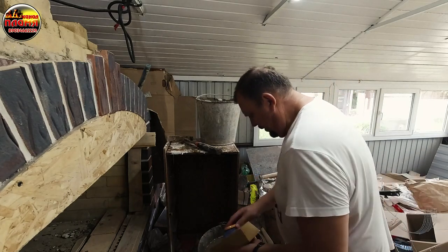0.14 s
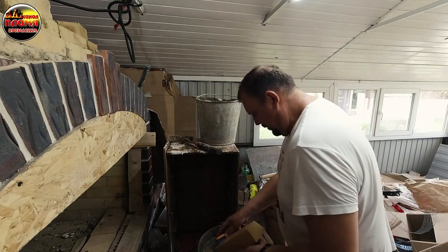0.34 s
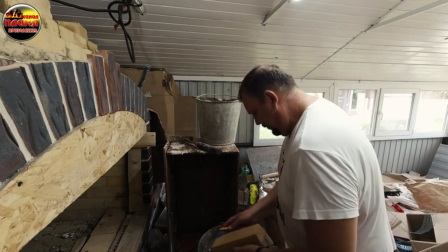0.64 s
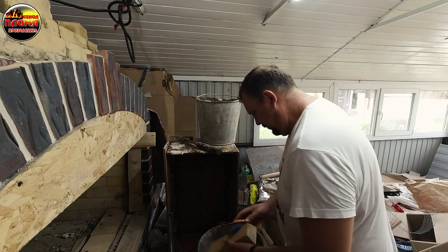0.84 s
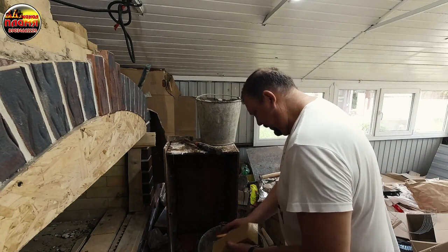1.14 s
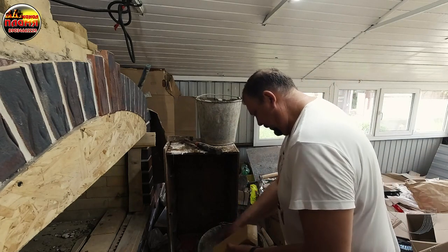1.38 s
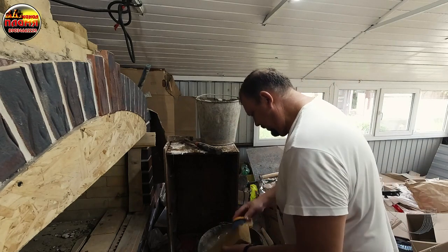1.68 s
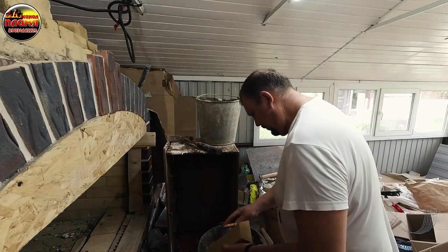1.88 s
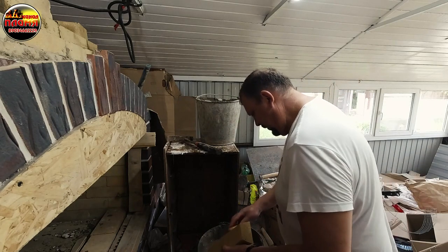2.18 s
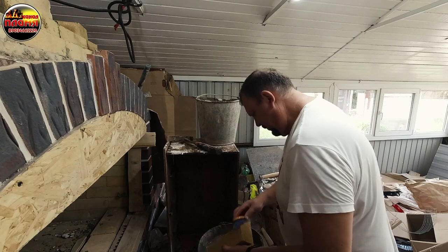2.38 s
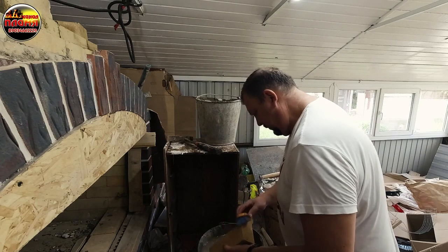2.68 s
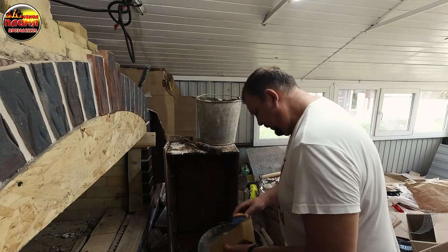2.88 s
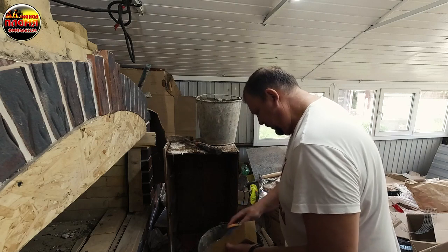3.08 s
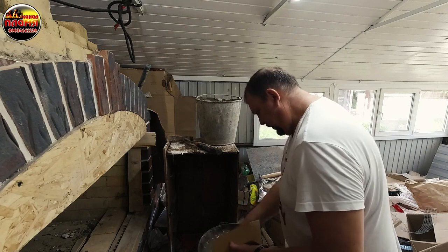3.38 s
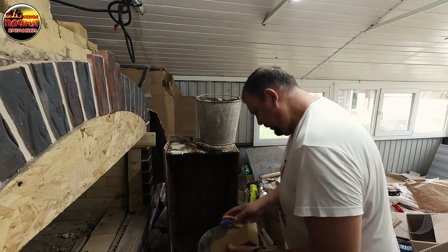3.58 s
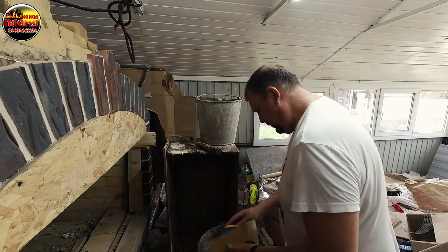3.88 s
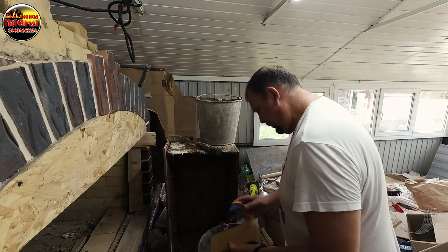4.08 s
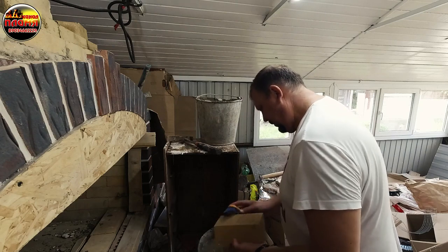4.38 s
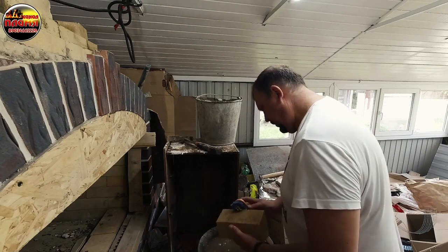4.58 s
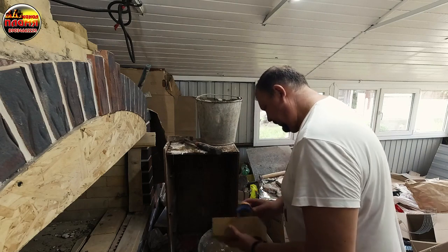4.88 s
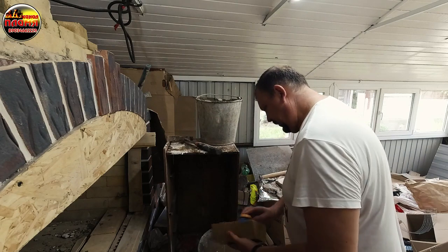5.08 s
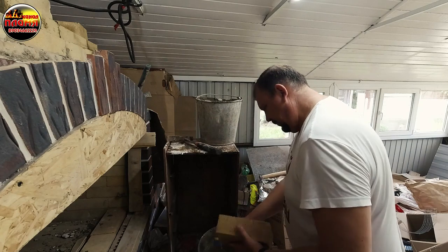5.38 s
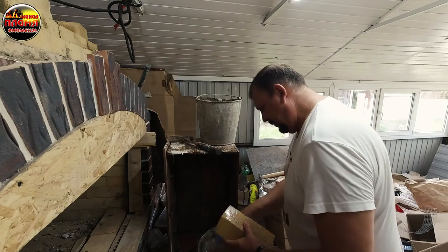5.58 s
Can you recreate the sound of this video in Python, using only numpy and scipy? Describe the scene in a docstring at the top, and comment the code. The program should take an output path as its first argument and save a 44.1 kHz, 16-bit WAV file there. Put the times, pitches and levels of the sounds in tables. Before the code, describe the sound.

A small wet brush scrubs a brick in quick, uneven strokes, the bristles hissing and rasping over grit. Between strokes it dips into a basin, making sharp little splashes, plops and fizzing droplets, with a soft low boom from the basin wall. One faint, thin squeak comes about midway, then the scrubbing and splashing carry on. The sound is fairly close, in a quiet workshop with a brief echo and a faint low rumble.

```python
"""Bristles hiss over grit, stroke after stroke: a wet brush scrubs a brick over a basin.
The brush dips and slaps the water; bubbles ring as plops and fizz, droplets tick, and the
water pushes the basin wall into a soft boom. One faint squeak sounds midway.
Floor and bench rumble under the work; the low workshop answers briefly."""
import sys
import numpy as np
from scipy import signal
from scipy.fft import rfft, irfft, next_fast_len
from scipy.io import wavfile
from scipy.ndimage import uniform_filter1d, map_coordinates

SR = 44100
rng = np.random.default_rng(int(sys.argv[2]) if len(sys.argv) > 2 else 0)


def to_wav(s):
    """Save 16-bit WAV."""
    ch = np.atleast_2d(s).T  # columns
    pcm = np.round(np.clip(ch, -1, 1) * 32767)  # PCM
    wavfile.write(sys.argv[1], SR, pcm.astype(np.int16))


N = 253134

# Spectra of room air, bench, stirred water and bristles. Each row: frequency in Hz, relative level in dB.
AIR_SPECTRUM = [(40, -25), (90, 2.5), (140, -1.5), (300, -9), (600, -6.5), (1500, -27), (3200, -13.5),
                (7500, -21.5), (16000, -80)]
BENCH_SPECTRUM = [(15, -33), (28, -0.5), (57, 5), (85, -12.5), (130, -69)]
FROTH_SPECTRUM = [(300, -20.5), (500, -8.5), (900, -3), (2000, 2), (3500, -4), (6000, -20.5), (16000, -66)]
BRISTLE_SPECTRUM = [(350, -60), (600, -9.5), (757, -28), (1400, -21.5), (1630, -16.5), (1770, -11),
                    (3590, -3), (3950, -4.5), (7310, -3), (9350, -9.5), (13900, -5), (15700, -18)]
# Stereo image. Each row: frequency in Hz, left-right correlation.
CORRELATION = [(30, 0.97), (200, 0.7), (700, 0.95), (1500, 0.65), (3000, 0.35), (16000, 0.45)]
# Room decay. Each row: frequency in Hz, T60 in seconds.
ROOM_T60 = [(200, 0.21), (1000, 0.21), (4000, 0.25), (12000, 0.19)]
# Floor and bench shaking. Each row: time in seconds, level in dB.
RUMBLE_LEVEL = [(0, -53.5), (.8, -56.5), (.93, -46.5), (1.1, -54), (1.45, -43.5), (2.15, -49), (2.4, -55),
                (3.4, -55), (3.6, -52), (4.0, -49), (4.2, -55.5), (5.3, -55.5), (5.74, -50)]
# Basin resonances. Each row: frequency in Hz, width in Hz, weight in dB.
BASIN_MODES = [(147.8, 37.4, -2.5), (242, 122, -4), (306.6, 180, -5)]
# Water pushing the basin wall. Each row: start in seconds, hold in seconds, level in dB.
WALL_PUSHES = [(1.14, 0.3, -42), (1.486, 0.084, -36), (1.647, 0.03, -38), (1.799, .005, -37),
               (1.947, .005, -39), (2.087, 0.17, -54), (3.24, 0.0046, -52), (3.528, .005, -52),
               (3.674, 0.091, -47), (4.187, 0.056, -53), (4.323, 0.051, -44.5), (4.633, 0.0049, -51),
               (5.423, .005, -51.5)]
# Squeak contour. Each row: time in seconds, pitch in Hz, level in dB.
SQUEAK_PATH = [(2.43, 2480, -66), (2.46, 2463, -42), (2.58, 2442, -37.5), (2.61, 2380, -37),
               (2.69, 2345, -62)]
# Stirred water. Each row: start, rise and hold in seconds, level in dB, fade in dB per second.
WATER_SURGES = [(0.19, 0.17, 0.076, -43, 100), (0.37, 0.013, 0.052, -35, 174),
                (0.878, 0.0097, 0.02, -38, 240), (1.159, 0.052, 0.069, -40.5, 60),
                (1.432, 0.012, 0.0086, -27.5, 370), (1.503, 0.04, 0.1, -36, 210),
                (1.674, 0.019, 0.12, -36.5, 177), (1.865, 0.047, 0.036, -31.5, 160),
                (1.964, 0.023, 0.071, -38, 210), (2.091, 0.012, 0.015, -30.5, 106),
                (2.3, 0.17, 0, -34.5, 302), (2.62, 0.068, 0, -43, 430), (3.1, .3, 0, -44, 210),
                (3.428, 0.059, 0.045, -41, 340), (3.565, 0.009, 0.011, -30.5, 126),
                (3.834, 0.078, 0.054, -30, 101), (4, 0.027, 0.027, -25.5, 248),
                (4.179, 0.012, 0.019, -26, 131), (4.398, 0.11, 0.03, -37, 504),
                (5.188, 0.02, 0.016, -37, 220), (5.33, 0.11, 0.068, -41.5, 210), (5.44, 0.025, 0, -33, 262),
                (5.612, 0.013, 0, -29, 340)]
# Large bubbles and high droplets. Each row: start in seconds, level in dB, pitch in Hz, life in ms.
BUBBLES_AND_DROPLETS = [(.312, -34.5, 837, 14), (.379, -19, 620, 10), (.402, -20, 838, 6.6), (.424, -22, 670, 8.4),
                        (0.445, -28, 874, 7.3), (0.509, -28.5, 3560, 3.5), (0.891, -22.5, 1437, 7.2),
                        (1.242, -26, 3520, 14), (1.44, -20.5, 3020, 17), (1.442, -18, 1960, 13),
                        (1.451, -25, 564, 7.7), (1.498, -26, 1150, 7.2), (1.527, -12.5, 3420, 4.3),
                        (1.539, -35, 6700, 4), (1.570, -28, 5900, 3), (1.594, -25.5, 3700, 3.1),
                        (1.604, -16.5, 820, 3.1), (1.638, -19, 2960, 5.1), (1.639, -24, 1240, 13),
                        (1.682, -30, 225, 10.7), (1.712, -30, 263, 17), (1.734, -30, 4500, 3),
                        (1.756, -23, 2030, 5.8), (1.765, -31, 4800, 4), (1.857, -26, 3750, 6),
                        (1.876, -32.5, 890, 24), (1.907, -28, 4980, 6), (1.907, -25.5, 1425, 6.5),
                        (1.936, -25.5, 1210, 4.1), (1.968, -28.5, 233, 12.6), (2.006, -17.5, 540, 4.8),
                        (2.014, -23, 432, 12.6), (2.105, -7, 687, 7.6), (2.109, -19.5, 1450, 10),
                        (2.158, -20, 585, 11.8), (2.169, -27.5, 1267, 17), (2.150, -31.5, 2206, 34),
                        (2.433, -25.5, 2480, 5.5), (2.459, -24.5, 1780, 5.1), (3.399, -19.5, 2590, 5.8),
                        (3.473, -23, 2150, 4.6), (3.572, -12, 630, 7), (3.65, -20, 1374, 2.5),
                        (3.828, -26.5, 1430, 6.4), (3.878, -22, 4400, 4.6), (3.885, -19, 2050, 5),
                        (3.946, -26.5, 634, 13), (3.989, -20, 2090, 6.3), (4.027, -22, 1140, 4.4),
                        (4.041, -14, 748, 5.9), (4.126, -27.5, 6300, 7), (4.186, -19, 3220, 4),
                        (4.187, -16.5, 1780, 6.7), (4.200, -13.5, 1504, 6.4), (4.208, -27.5, 790, 11),
                        (4.247, -23, 1420, 11.6), (4.252, -18.5, 655, 5.4), (4.281, -17, 3480, 4.5),
                        (4.353, -24, 2110, 5.3), (4.427, -27, 1670, 6.4), (4.856, -43.5, 5820, 24),
                        (4.89, -28.5, 1460, 10.7), (5.008, -41, 4880, 15), (5.207, -30.5, 843, 13.6),
                        (5.209, -18.5, 2080, 2.5), (5.217, -23.5, 3640, 4.4), (5.238, -15, 2144, 4.9),
                        (5.447, -22.5, 2220, 6.8), (5.469, -25, 1330, 3.3), (5.469, -24.5, 883, 5.8),
                        (5.623, -24, 3320, 4.2)]
# Water slaps and brush taps. Each row: start in seconds, level in dB, decay in ms, centre in Hz.
WATER_SLAPS = [(1.422, -23, 6, 3700), (1.438, -14, 11.4, 2950), (1.528, -34, 8.7, 3980),
               (1.698, -21.5, 14, 2020), (1.746, -30, 4.4, 5500), (1.750, -22.5, 17, 2230),
               (1.843, -26, 30, 2330), (2.102, -24, 29, 1160), (2.528, -33, 9.6, 2280),
               (2.683, -18, 6.5, 2930), (2.82, -39, 18, 2940), (3.131, -42, 14, 3240),
               (3.386, -21.5, 15, 2440), (3.469, -24, 23, 2580), (3.572, -28, 5.4, 2900),
               (3.7, -32, 15, 1880), (3.778, -33, 50, 2500), (3.873, -22.5, 13, 3030),
               (4.125, -35, 7.5, 6070), (4.188, -22, 4.9, 2780), (4.353, -32.5, 18, 1910),
               (4.415, -27.5, 7.3, 2170), (4.674, -40, 6.5, 3070), (4.713, -34, 7, 3700),
               (4.889, -39, 24, 2400), (5.126, -51.5, 20, 3500), (5.445, -23.5, 8, 9800),
               (5.465, -28, 7, 2540), (5.613, -25, 36, 2900)]
# Brush contacts. Each row: start, rise and hold in seconds, level in dB, fade in dB per second,
# dullness from 0 to 1.
BRUSH_STROKES = [(-.1, 0.043, .11, -37.5, 254, 0.24), (0.247, 0.074, 0.17, -27, 272, 0.4),
                 (0.681, 0.022, 0.0067, -43.5, 136, 0.72), (0.737, 0.1, 0.069, -35, 61, 0.22),
                 (0.831, 0.14, 0.034, -32, 130, 0.15), (1.145, 0.092, 0.071, -24, 185, 0.14),
                 (1.405, 0.046, .002, -23.5, 388.5, 0.39), (1.523, 0.011, .005, -32.5, 140, 0.63),
                 (1.73, 0.018, 0.013, -34.5, 68, 1), (1.831, 0.098, 0.019, -28.5, 87, 0.5),
                 (2.087, 0.012, 0.0044, -39.5, 100, 1), (2.127, 0.024, .005, -36, 126, 0.4),
                 (2.234, 0.053, 0.082, -31, 146, 0.45), (2.461, 0.014, .005, -38.5, 140, 0.99),
                 (2.558, 0.045, 0.069, -30.5, 168, 0.38), (2.856, 0.071, 0.064, -30.5, 248, 0.36),
                 (3.182, 0.087, 0.11, -27, 242, 0.18), (3.449, 0.039, .002, -28, 350, 0.62),
                 (3.56, 0.013, .002, -36, 403, 0.75), (3.76, 0.058, .01, -44.5, 90, 0.4),
                 (3.852, 0.091, 0.072, -31.5, 40, 0.43), (3.897, 0.18, 0.047, -33, 250, 0.46),
                 (4.12, 0.018, 0.3, -36.5, 125, 0.7), (4.404, 0.075, 0.011, -26, 151, 0.52),
                 (4.672, 0.042, 0.0021, -42, 273, 0.98), (4.845, 0.052, 0.1, -50.5, 207, 1),
                 (4.974, 0.039, 0.0018, -45.5, 253, .15), (5.207, 0.091, 0.17, -26.5, 330, 0.47),
                 (5.598, 0.033, 0.0017, -24.5, 456, 0.5), (5.67, 0.026, .05, -42.5, 200, 0.83)]

GAIN_HOP = 32  # samples


def amp(db):
    return 10 ** (np.asarray(db) / 20)


def unit_rms(x):
    return x / np.sqrt(np.mean(x ** 2) + 1e-20)


def at_hz(rows, hz):
    """Interpolate (Hz, value) rows on a log axis."""
    knots_hz, values = np.transpose(rows)
    return np.interp(np.log(hz + 1), np.log(knots_hz + 1), values)


def curves(rows):
    """Per-sample curve for each column after the time."""
    time_s, *columns = np.transpose(rows)
    return [np.interp(np.arange(N) / SR, time_s, column) for column in columns]


def wobble(rate_hz):
    """Smooth random curve, about unit size."""
    return map_coordinates(rng.standard_normal(int(N * rate_hz / SR) + 4), [np.arange(N) * rate_hz / SR])


def filtered(x, response):
    """Apply a complex response, given as a function of Hz."""
    size = next_fast_len(N + SR // 2)
    return irfft(rfft(x, size) * response(np.fft.rfftfreq(size, 1 / SR)), size)[..., :N]


def mid_side_gains(hz):
    angle = np.arccos(np.clip(at_hz(CORRELATION, hz), 0, 1)) / 2
    return np.array([np.cos(angle), np.sin(angle)])


def spread(pair, spectrum):
    """Colour two independent noises and mix to partly correlated stereo, rms 1."""
    mid, side = filtered(pair, lambda hz: amp(at_hz(spectrum, hz)) * mid_side_gains(hz))
    return unit_rms(np.array([mid + side, mid - side]))


def patchy_noise(depth_db):
    """Two noises sharing narrow, lingering patches of gain, capped so none becomes a note."""
    spectra = signal.stft(rng.standard_normal((2, N + 512)), nperseg=512)[2]
    patches = uniform_filter1d(rng.standard_normal(spectra.shape[1:]), 2, axis=0)
    patches = unit_rms(uniform_filter1d(patches, 7, axis=1))
    return signal.istft(spectra * amp(depth_db * np.minimum(patches, 1.5)), nperseg=512)[1][:, :N]


def swells(start_s, rise_s, hold_s, db, fade_db_per_s, droop_db_per_s=0):
    """Coarse rise-hold-fade gain per gesture, and seconds spent fading."""
    t = np.arange(0, N, GAIN_HOP) / SR - start_s[:, None]
    rise_s, hold_s, db, fade_db_per_s = (np.reshape(v, (-1, 1)) for v in (rise_s, hold_s, db, fade_db_per_s))
    fading_s = np.maximum(t - rise_s - hold_s, 0)
    level_db = db - droop_db_per_s * np.clip(t - rise_s, 0, hold_s) - fade_db_per_s * fading_s
    return np.clip(t / rise_s, 0, 1) ** 0.97 * amp(level_db), fading_s


def per_sample(coarse):
    return np.interp(np.arange(N), np.arange(0, N, GAIN_HOP), coarse)


def power_sum(gains, rest_db):
    return per_sample(np.sqrt(np.sum(gains ** 2, 0) + amp(rest_db) ** 2))


def bubbles(start_s, gain, hz, life_s, climb, swell=3):
    """Short sines that swell, die and climb in pitch as each bubble nears the surface."""
    t = np.arange(round(2.5 * life_s.max() * SR)) / SR
    age = 4.5 * t / life_s[:, None]
    envelope = gain[:, None] * (age / swell) ** swell * np.exp(swell - age)
    phase = 2 * np.pi * hz[:, None] * t * (1 + np.reshape(climb, (-1, 1)) * age)
    index = np.round(start_s * SR).astype(int)[:, None] + np.arange(len(t))
    return np.bincount(index.ravel(), (envelope * np.sin(phase)).ravel(), N + SR)[:N]


def room_air():
    """Quiet, steady workshop noise."""
    return amp(-56.5) * spread(patchy_noise(depth_db=1.0), AIR_SPECTRUM)


def bench_rumble():
    """Floor and bench shake under the work."""
    level_db, = curves(RUMBLE_LEVEL)
    return amp(level_db) * spread(patchy_noise(depth_db=2.5), BENCH_SPECTRUM)


def room_echo(x):
    """Wall reflections, each frequency dying at its own rate; a new tail every third of a second."""
    out = np.zeros((2, N + 2 * SR))
    hop, predelay = SR // 3, 250  # samples
    for start in range(0, N, hop):
        hz, t, noise = signal.stft(rng.standard_normal((2, SR // 2)), SR, nperseg=256)
        mid, side = noise * mid_side_gains(hz)[..., None]
        decay = amp(-60 * t / at_hz(ROOM_T60, hz)[:, None])
        tail = signal.istft(np.array([mid + side, mid - side]) * decay, SR, nperseg=256)[1]
        wet = signal.fftconvolve(x[None, start:start + hop], tail / np.linalg.norm(tail[0]), axes=1)
        out[:, start + predelay:][:, :wet.shape[1]] += wet
    return out[:, :N]


def basin_boom():
    """Lumpy water pressure rings the low modes of the basin."""
    def wall(hz):
        return sum((-1) ** k * amp(db) * 1j * hz * width_hz / (mode_hz ** 2 - hz ** 2 + 1j * hz * width_hz)
                   for k, (mode_hz, width_hz, db) in enumerate(BASIN_MODES))

    start_s, hold_s, db = np.transpose(WALL_PUSHES)
    gains, _ = swells(start_s, rise_s=0.053, hold_s=hold_s, db=db, fade_db_per_s=188)
    pressure = rng.standard_normal(N) * amp(2.0 * wobble(25))
    return power_sum(gains, rest_db=-62) * unit_rms(filtered(pressure, lambda hz: wall(hz) ** 2))


def squeak():
    """Thin, slightly unsteady whistle."""
    hz, db = curves(SQUEAK_PATH)
    t = np.arange(N) / SR
    sounding = (t > SQUEAK_PATH[0][0]) & (t < SQUEAK_PATH[-1][0])
    gain = amp(db + 0.99 * wobble(40.9)) * sounding
    return gain * np.sin(2 * np.pi * np.cumsum(hz + 8 * wobble(60)) / SR)


def spatter():
    """Fine droplets tick and fizz left and right of the brush."""
    when, pitch, strength, length = rng.random((2400, 4)).T
    start_s, hz = when * N / SR, 3000 * 2.9 ** pitch
    gain = amp(-5 * np.log(strength + 0.08))
    life_s = (2.2 + 6 * length) / hz
    centre, left, right = (bubbles(start_s[k::3], gain[k::3], hz[k::3], life_s[k::3], climb=0.012)
                           for k in range(3))
    return unit_rms(np.array([centre + left, centre + right]))


def froth():
    """Stirred water surges: mono fizz of small bubbles, stereo wash with droplets."""
    gains, _ = swells(*np.transpose(WATER_SURGES))
    level = power_sum(gains, rest_db=-61.5)
    when, pitch, strength, length = rng.random((1500, 4)).T
    hz = 600 * 13.0 ** pitch
    gain = amp(-4.5 * np.log(strength + 0.054) + at_hz(FROTH_SPECTRUM, hz))
    fizz = unit_rms(bubbles(when * N / SR, gain, hz, life_s=(2.54 + 5.8 * length) / hz, climb=0.011))
    churn = patchy_noise(depth_db=6) * amp(4.0 * wobble(30) + 3.4 * wobble(90))
    wash = spread(churn, FROTH_SPECTRUM) + amp(-21.5) * spatter()
    return amp(-5.5) * level * fizz, level * wash


def plops():
    """Large bubbles and high droplets ring as ragged notes; the deeper ones climb most."""
    start_s, db, hz, life_ms = np.transpose(BUBBLES_AND_DROPLETS)
    notes = bubbles(start_s, amp(db), hz, life_ms / 1000, climb=7 / hz, swell=2.39)
    return notes * amp(1.1 * wobble(350) + 0.8 * wobble(1100))


def slaps():
    """Each slap is a gritty burst around the pitch of the cavity it opens."""
    out = np.zeros(N + SR)
    size = SR // 8
    t, hz = np.arange(size) / SR, np.fft.rfftfreq(size, 1 / SR)
    for start_s, db, decay_ms, centre_hz in WATER_SLAPS:
        grit = rng.standard_normal(size) * np.repeat(amp(2.5 * rng.standard_normal(size)), 40)[:size]
        cavity = 1 / (1 + (1.18 * (hz / centre_hz - centre_hz / (hz + 1))) ** 2)
        lowpass = 1 / (1 + (hz / (2.0 * centre_hz)) ** 4)
        burst = unit_rms(irfft(rfft(grit) * cavity * lowpass, size))
        age = t / (decay_ms / 1000)
        envelope = (1 - np.exp(-age / 0.3)) * np.exp(-age ** 2)
        out[round(start_s * SR):][:size] += amp(db) * envelope * burst
    return out[:N]


def brush():
    """Bristle tips flick over the grit; a soaked brush loses its top and gains a throaty rasp."""
    *gesture, stroke_dullness = np.transpose(BRUSH_STROKES)
    gains, fading_s = swells(*gesture, droop_db_per_s=18)  # a held stroke slows and weakens
    dulling = stroke_dullness[:, None] + 0.4 * fading_s
    dullness = np.sum(gains ** 2 * dulling, 0) / (np.sum(gains ** 2, 0) + 1e-12)
    dullness = np.clip(per_sample(dullness), 0, 1)
    flicks = patchy_noise(depth_db=3.0) * amp(0.72 * wobble(900) + 1.3 * wobble(40) + 0.62 * wobble(180))
    hiss = spread(flicks, BRISTLE_SPECTRUM)
    rasp = filtered(hiss, lambda hz: (1 + 2.4 / (1 + ((hz - 2700) / 900) ** 2)) / (1 + (hz / 7500) ** 8))
    return power_sum(gains, rest_db=-90) * ((1 - dullness) * hiss + dullness * rasp)


def scene():
    """Brush, water and basin in the workshop."""
    fizz, wash = froth()
    notes = fizz + plops() + squeak()
    splash, boom = slaps(), basin_boom()
    hiss = brush() + wash
    # Low notes radiate all round and fill the room most.
    low_notes = filtered(notes, lambda hz: 1 / (1 + (hz / 3200) ** 2))
    echo = room_echo(amp(-1.5) * low_notes + amp(-2.5) * splash + amp(-9.0) * (hiss[0] + boom))
    return room_air() + bench_rumble() + echo + boom + notes + splash + hiss


def record(dry):
    """Brick-wall low-pass."""
    return filtered(dry, lambda hz: hz < 15850)


dry = scene()
out = record(dry)
to_wav(out)
```